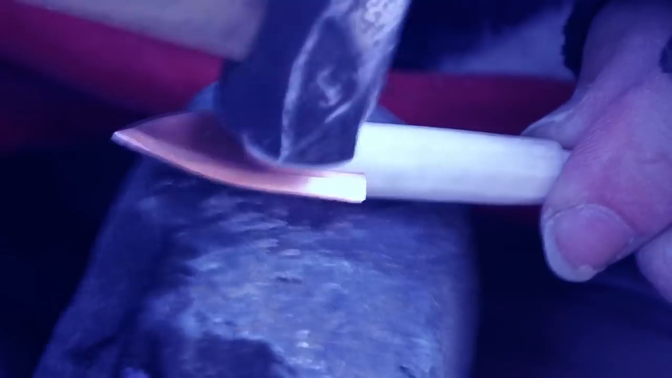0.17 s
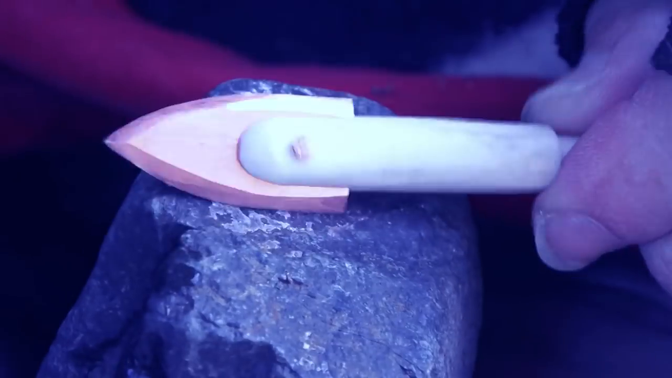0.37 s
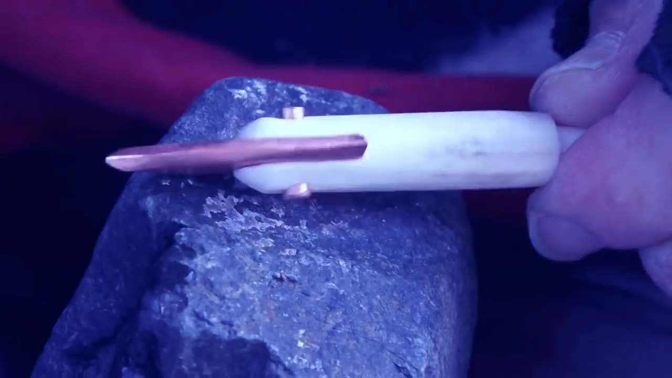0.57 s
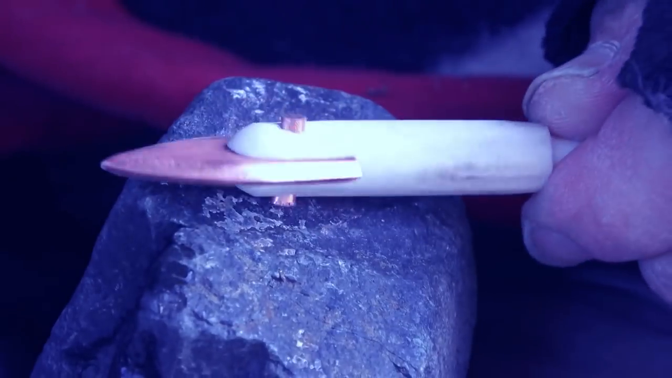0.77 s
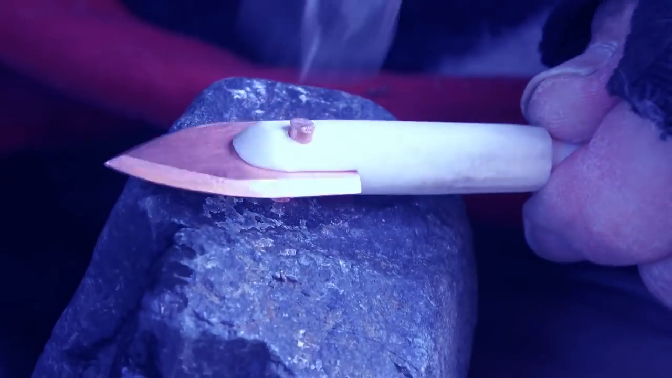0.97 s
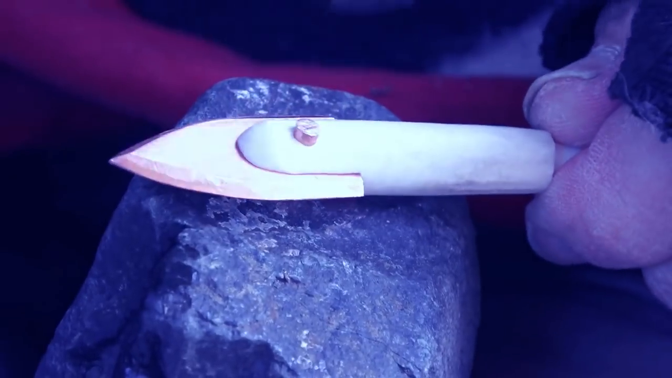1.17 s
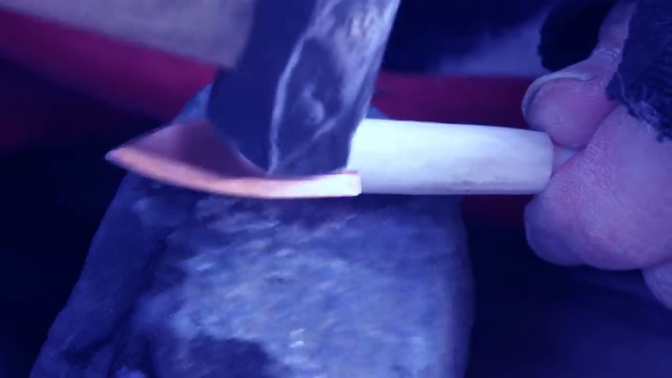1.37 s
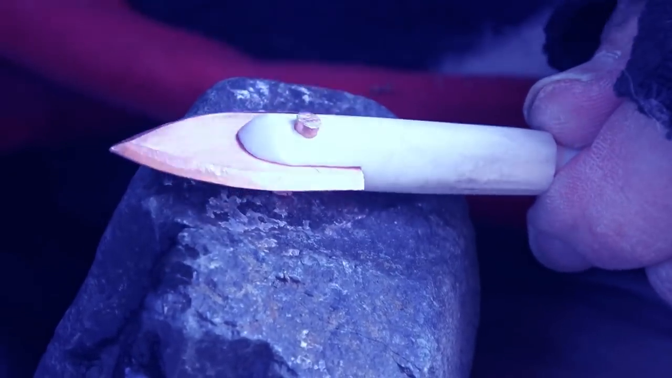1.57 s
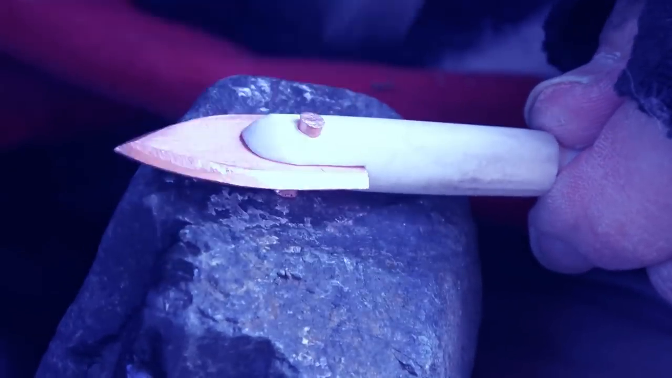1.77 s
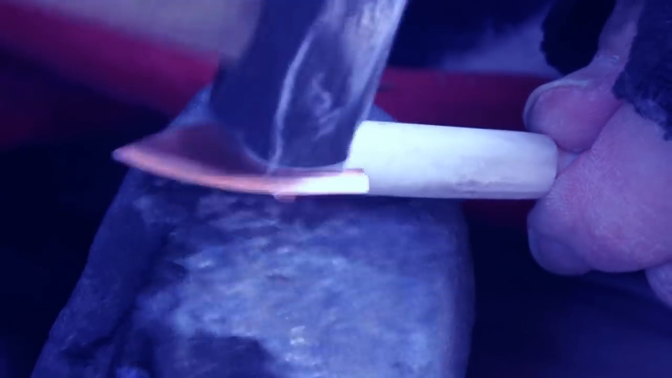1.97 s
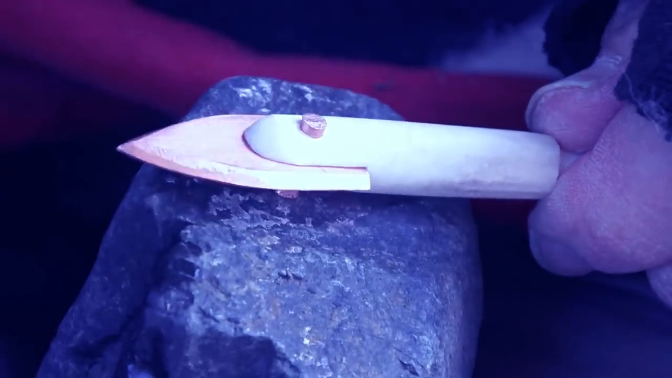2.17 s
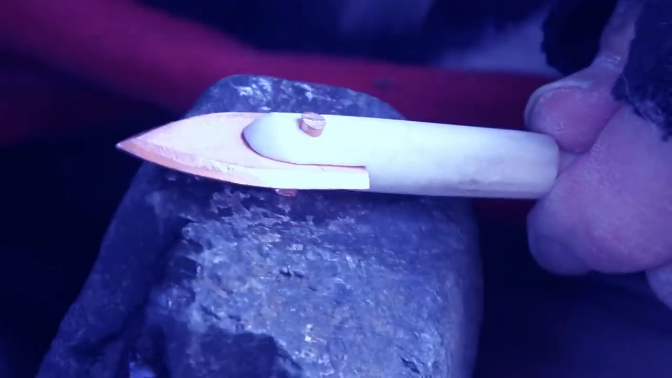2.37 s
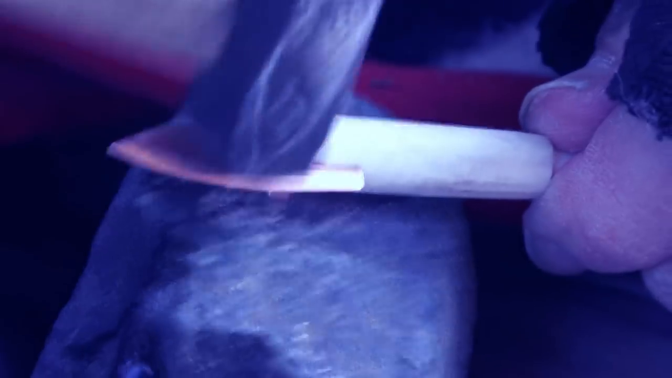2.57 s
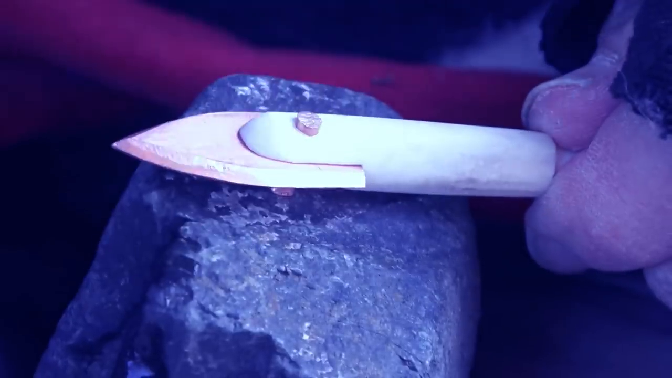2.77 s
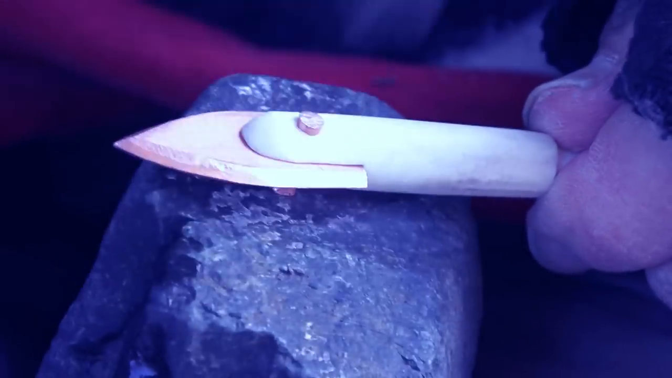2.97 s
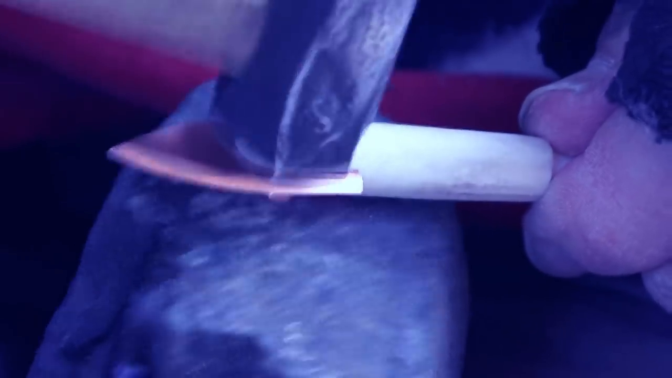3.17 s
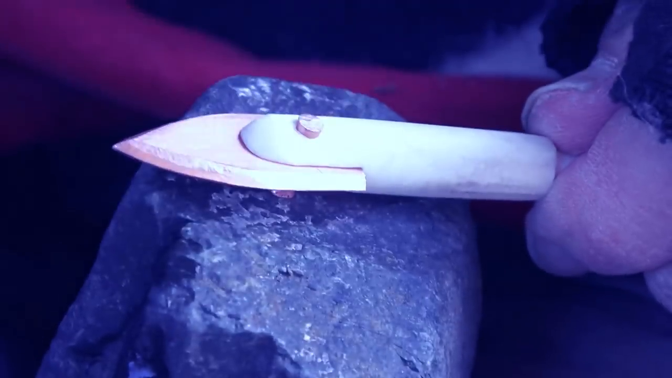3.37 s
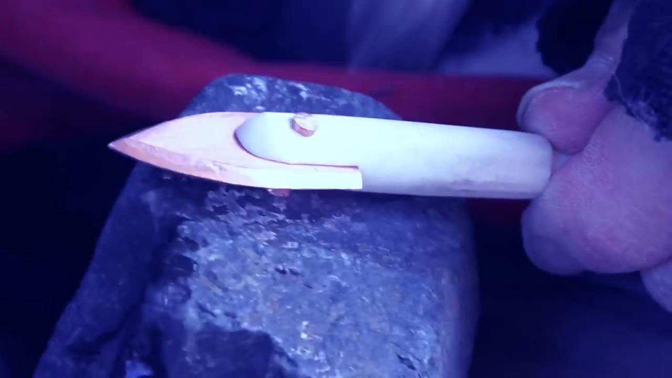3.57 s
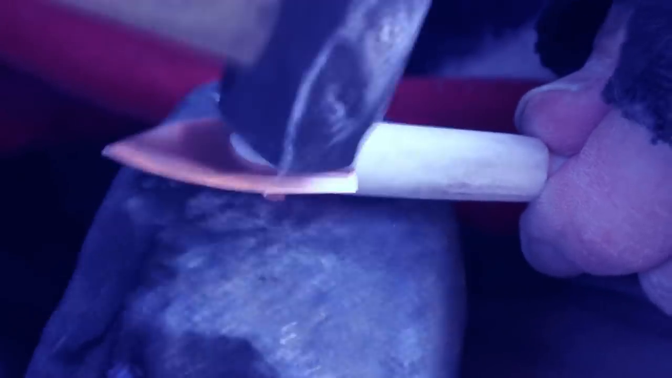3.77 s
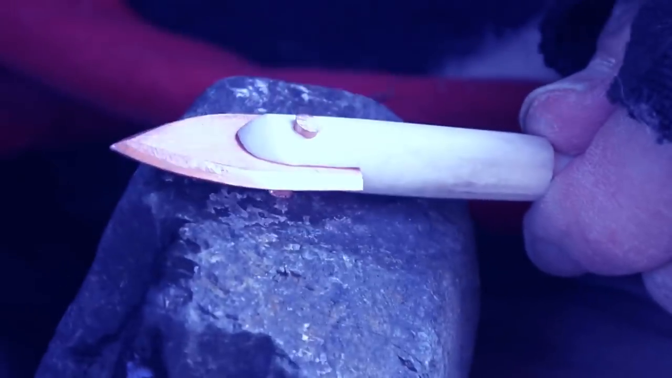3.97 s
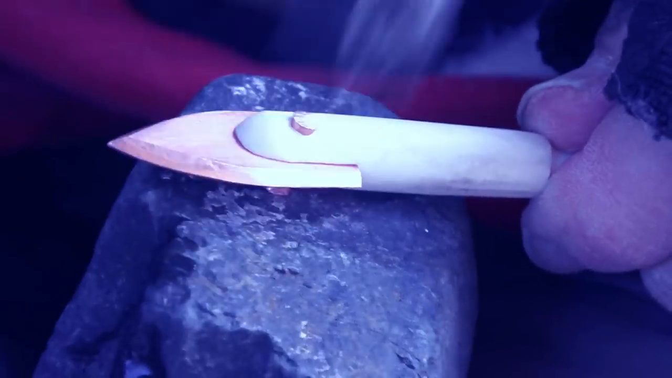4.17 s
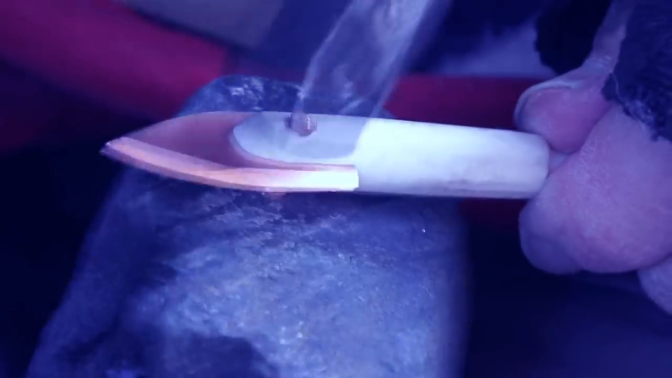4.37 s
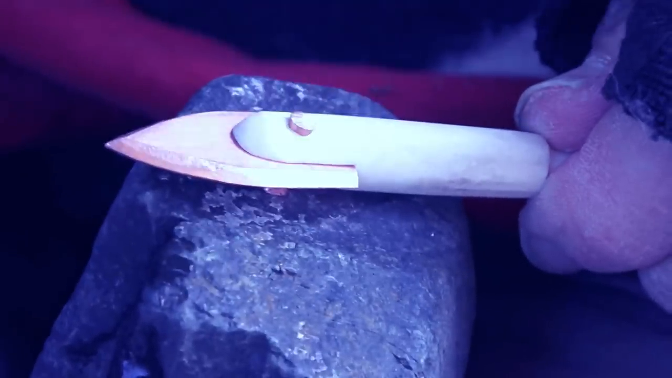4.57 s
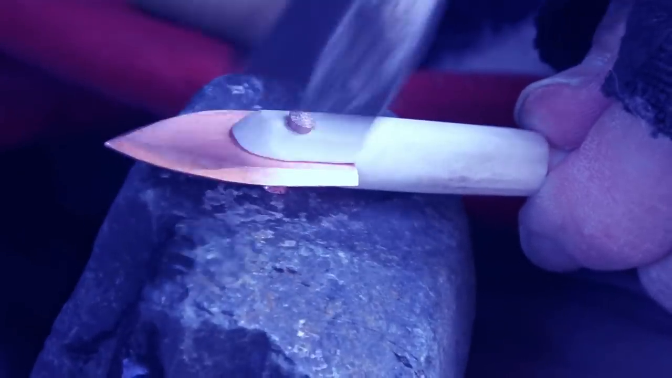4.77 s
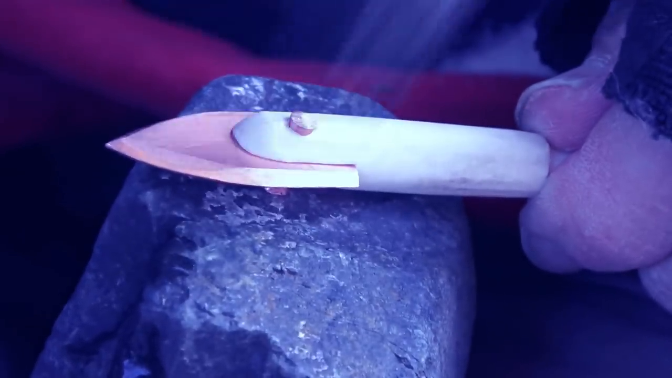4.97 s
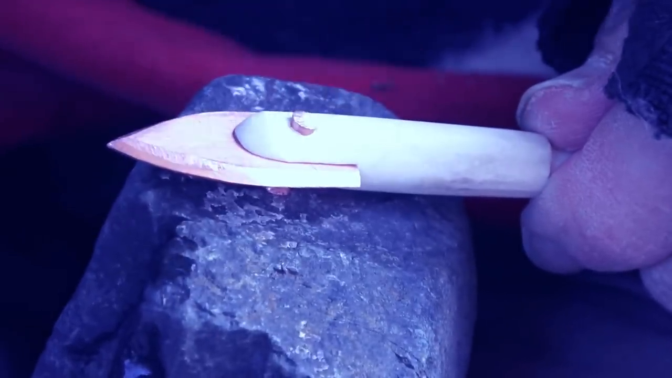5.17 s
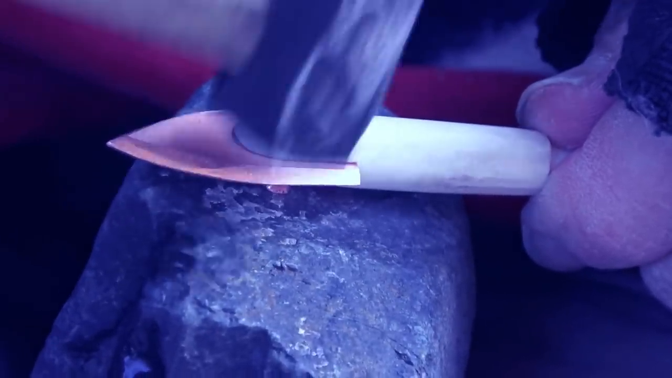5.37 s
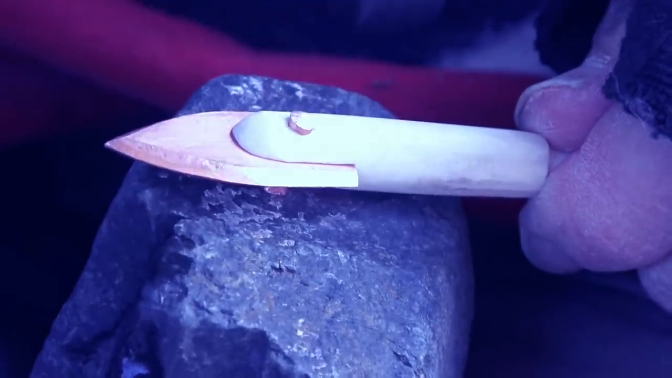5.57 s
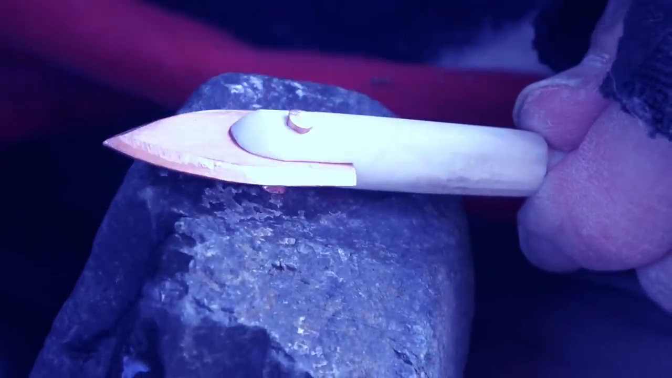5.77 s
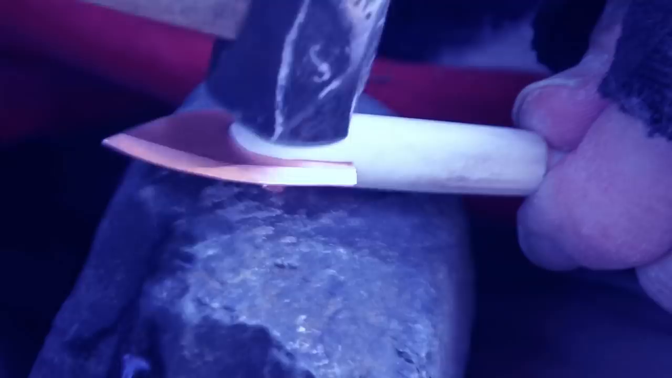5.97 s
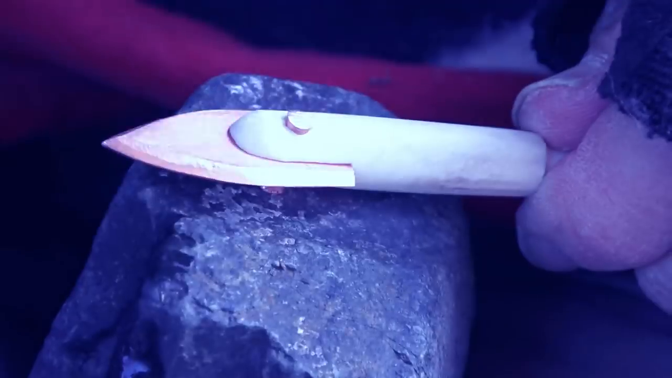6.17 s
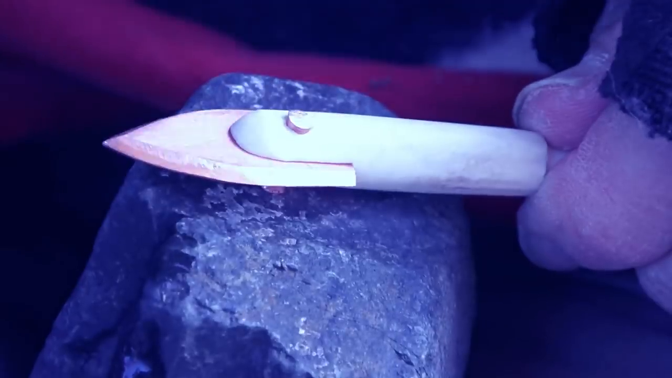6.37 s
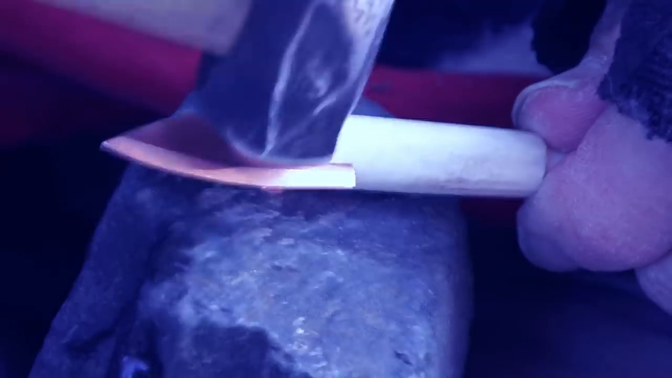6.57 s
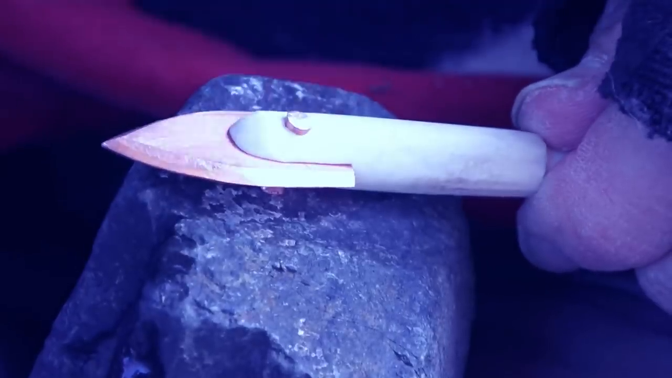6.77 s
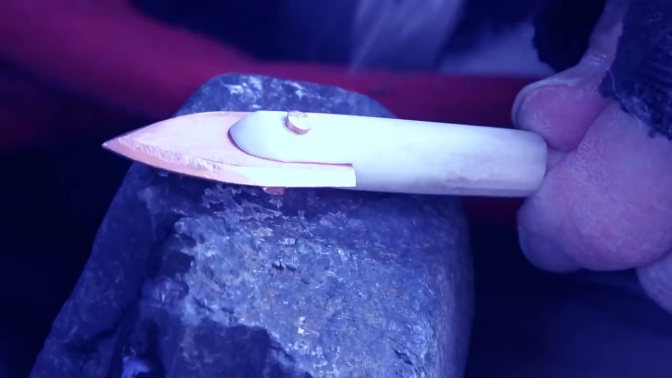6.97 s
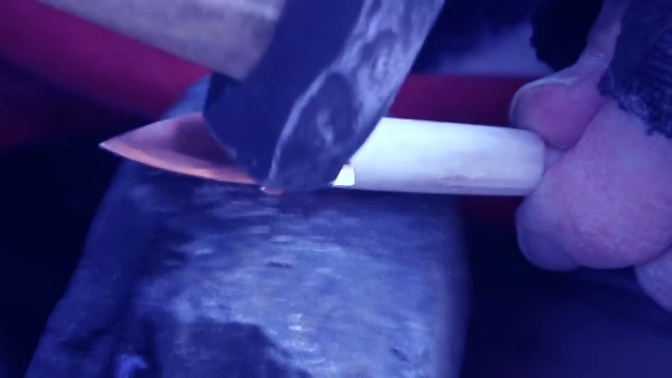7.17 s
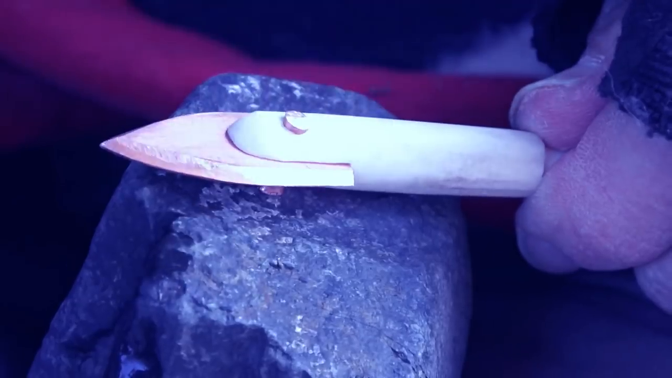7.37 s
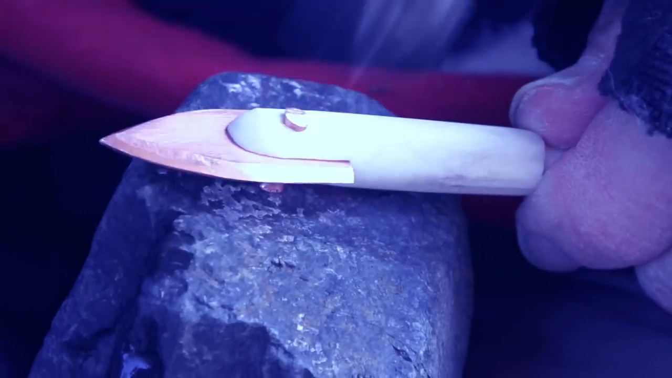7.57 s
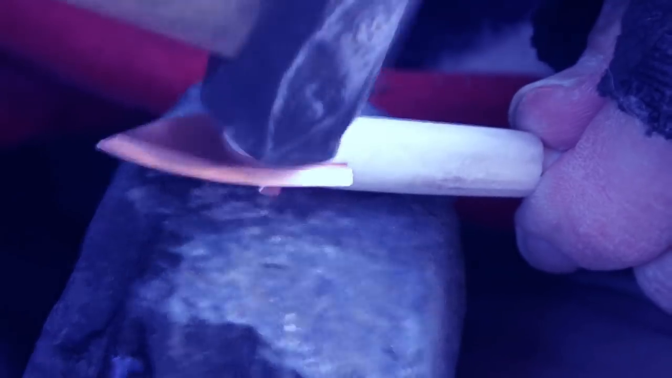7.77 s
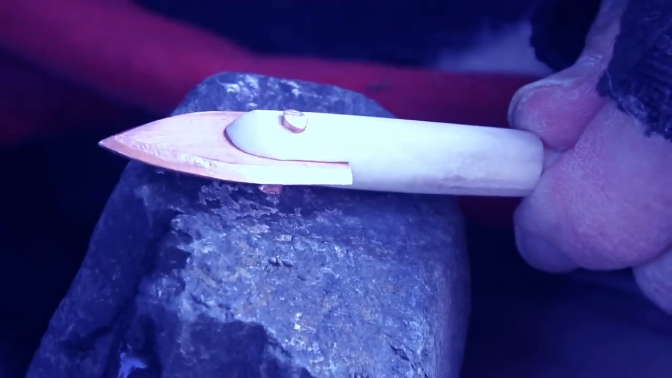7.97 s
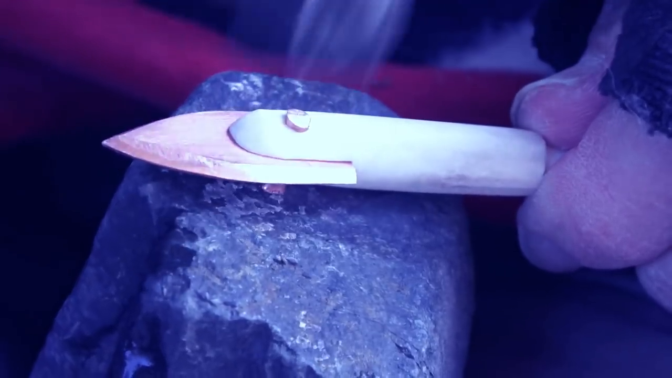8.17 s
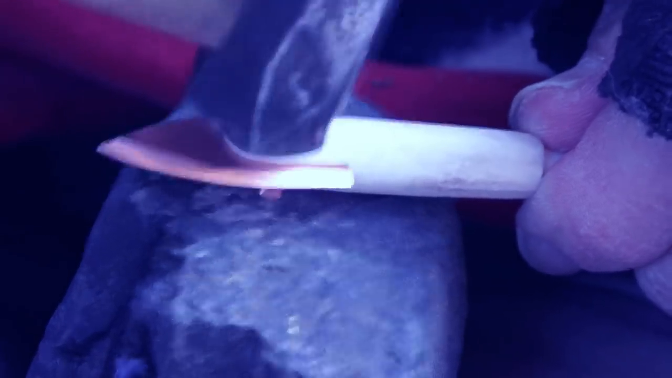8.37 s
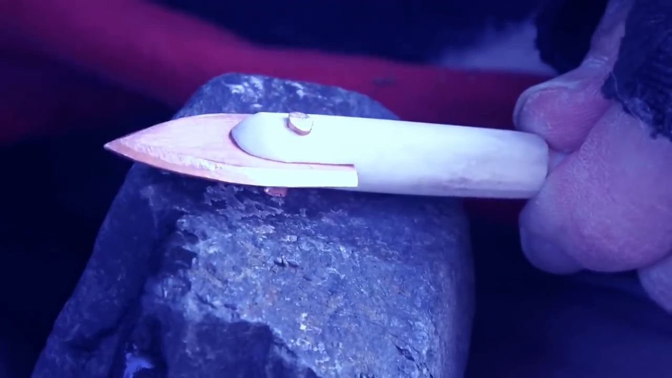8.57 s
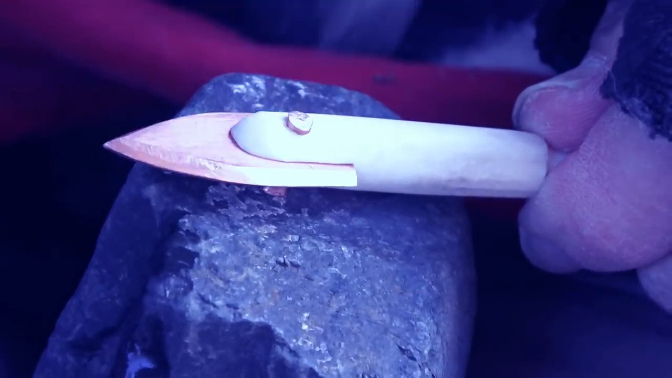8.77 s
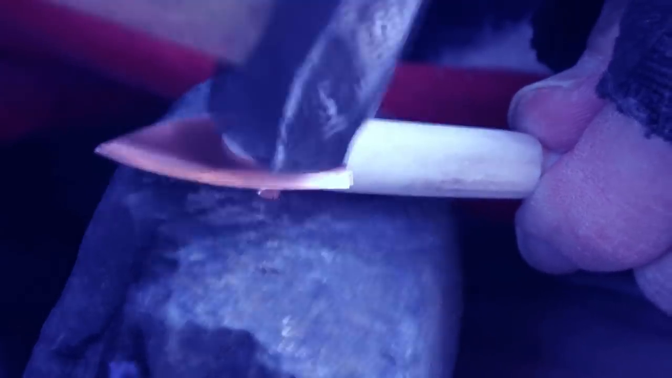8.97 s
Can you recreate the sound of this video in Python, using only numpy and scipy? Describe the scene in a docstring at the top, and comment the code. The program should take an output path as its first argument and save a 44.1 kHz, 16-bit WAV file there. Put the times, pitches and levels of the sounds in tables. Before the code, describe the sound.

A small hammer peens a copper rivet on a stone block, very close to one microphone. After a fading ring, one blow and a pause, the taps settle at about three a second, dry and hard with short steel rings, loud enough to distort. The work often bounces with a softer second click. A bird sings three quick high notes on three occasions over faint air and distant rumble.

```python
"""Copper rivet peened with a small hammer on a block of stone, one microphone close by, both channels alike.
It opens on a workshop still ringing from a blow; one blow, a pause, then about three a second to the end.
Each is a dry knock with a short steel ring, most loud enough to overload the input; after many the work
jumps and lands again. From 1.5 s a bird sings three notes, and again at 4.4 and 6.9 s: gliding sines, an echo.
Shaped noise makes the air and outdoor rumble throughout, with a swell near 2 s, then faint hums from afar."""
import sys
import numpy as np
from scipy import signal
from scipy.fft import rfft, irfft
from scipy.io import wavfile

SR = 44100
rng = np.random.default_rng(int(sys.argv[2]) if len(sys.argv) > 2 else 0)


def store_pcm(level_fs):
    """Save levels as 16-bit WAV."""
    pcm = np.round(np.clip(level_fs, -1, 1) * 32767).astype(np.int16)
    wavfile.write(sys.argv[1], SR, np.atleast_2d(pcm).T)


N = 401310

# hammer blows: [t/s, force level/dB, brightness/dB, high ping level/dB]
BLOWS = [(0.1779, 0, 2, -3), (1.0752, -7.5, -8.5, -6), (1.3961, -3.5, -0.5, -13), (1.6946, -3, 1, -2),
         (2.001, -1.5, 4, -4), (2.2984, 0, 2.5, -7), (2.5931, 0.5, 2, -10), (2.8916, -0.5, 3, 0.5),
         (3.1936, -1, 3.5, 8.5), (3.5008, -0.5, 3.5, 8.5), (3.8002, -1.5, 3.5, 9), (4.1058, -2.5, 3, 5.5),
         (4.4188, -1.5, 0, 1.5), (4.7344, -2.5, 4.5, 6), (5.0377, -2.5, 3, 4), (5.3547, -4, 0.5, -2),
         (5.6608, -3, 2, 2), (5.976, -4, 5, -10), (6.2836, -3, -0.5, 0), (6.582, -1, 3.5, 1),
         (6.8688, -1.5, 2.5, -2), (7.1717, -3, -3, -1.5), (7.4882, -3.5, -13, -2), (7.8050, -2, 0.5, -5),
         (8.1062, -0.5, 1.5, -4), (8.4068, -0.5, 2, -2), (8.7082, -1, 3.5, 5), (9.0074, -2, 3, 0)]
# the work lands again after a blow: [t/s, force level/dB]
REBOUNDS = [(1.7224, -19.5), (2.0317, -12), (2.918, -9), (3.2203, -8.5), (3.5355, -9.5), (3.8332, -10.5),
            (4.131, -11.5), (4.4564, -15.5), (5.076, -13), (5.3869, -16), (5.69, -12), (6.6199, -14.5),
            (6.9044, -10.5), (7.195, -12), (7.836, -12.5), (8.4408, -14), (9.0323, -12.5)]
# dead knock of rivet, haft and stone: [f/Hz, relative level/dB]
KNOCK = [(60, -12.5), (200, -14.5), (360, -1.5), (630, 5), (820, 0), (1000, -2), (1190, -5.5), (1450, 2),
         (1750, -1.5), (2100, -2), (3800, -15.5), (5000, -7.5), (9000, -22.5), (16000, -45.5)]
KNOCK_DB = 33  # added to the whole knock spectrum
# ringing modes of the steel head: [f/Hz, relative level/dB, t60/s]
HEAD = [(2872, -12.5, 0.013), (3006, -11, 0.017), (3107, -9.5, 0.025), (3345, -16, 0.021),
        (4605, -17.5, 0.009), (5810, -23, 0.015)]
# high ping of the head: [f/Hz, relative level/dB, t60/s]
PING = [(11632, -22.5, 0.072)]
PING_DB = 1  # added to every ping
# a square, bright blow rings the head, a dull one barely: level/dB at brightness 0, slope in dB per dB
RING_DB, RING_PER_BRIGHTNESS = -0.5, 1
# a harder landing pings more: level/dB at force 0, slope in dB per dB
REBOUND_PING_DB, REBOUND_PING_PER_FORCE = 18, 1.48
# as the rivet is beaten tight, a clack grows in the knock; it passes 0 dB at CLACK_USUAL_S
CLACK_HZ, CLACK_WIDTH_HZ, CLACK_DB_PER_S, CLACK_USUAL_S = 5040, 580, 0.9, 3
# the grip and the landing spot vary from blow to blow: standard deviations of the mode levels
HEAD_SCATTER_DB, KNOCK_SCATTER_DB = 1.6, 1.0
# the head rings sideways, towards hard surfaces nearby: [delay t/s, level/dB]
ECHOES = [(.0112, -6), (.0145, -13), (.0245, -15), (.028, -16), (.049, -21)]
# the nearest surface also returns the middle of the knock, most for square blows
SLAP_LOW_HZ, SLAP_HIGH_HZ, SLAP_DB = 1040, 1296, -13.5

# diffuse workshop sound: [f/Hz, level against the direct sound/dB, late t60/s]
ROOM = [(100, -12.5, 0.81), (450, -21.5, 0.22), (654, -25, 0.22), (1167, -10, 0.67), (1460, -21, 0.51),
        (2200, -18.5, 0.62), (2974, -12.5, 0.55), (3400, -6.5, 0.43), (4640, -24, 0.56), (8200, -16, 0.37),
        (11800, -13, 0.17), (15700, -2, 0.053)]
# resonances of the workshop: [f/Hz, level/dB, t60/s]
ROOM_MODES = [(579, -64, .12), (907, -66, .16), (1031, -66, .3), (1171, -65, .18), (1986, -68, .25),
              (3180, -66, .28), (3308, -67, .28)]
# the blow still ringing at the start: time before the start, force
EARLIER_S, EARLIER_DB = .125, 1.5

# voices of the bird's notes, before the pitch ratio and level of each singing:
# [length t/s, dip t/s, crest f/Hz, dip f/Hz, end f/Hz, level/dB, crescendo/dB, opening flick/share of pitch]
SLUR = [(.1, 0.038, 7690, 5610, 5980, -32.5, 0.5, .36), (.1, 0.05, 5630, 4465, 5090, -35, 13.5, 0.326)]
WHISTLE = [(.092, .014, 6950, 6960, 7060, -29.5, 5, 0)]
SWEEP = [(.141, .033, 4550, 3710, 4814, -30.5, 2.7, 0.31)]
NOTE_ATTACK_S, NOTE_RELEASE_S = 0.0093, .004
# three notes sung three times: [start t/s, note, pitch ratio, relative level/dB]
NOTES = [(1.49, SLUR, 1, 0), (1.685, WHISTLE, 1, 0), (1.847, SWEEP, 1, 0), (4.438, SLUR, 1.035, -7),
         (4.649, WHISTLE, 1.007, -5.5), (4.815, SWEEP, .99, -4), (6.885, SLUR, 1.01, -2),
         (7.137, WHISTLE, .99, 0), (7.314, SWEEP, 1.005, -.5)]
# echo around the bird: [f/Hz, level against the direct sound/dB, late t60/s]
YARD = [(2000, 10, 0.31), (4800, -4.5, 0.59), (6900, -2.5, 0.48), (12000, -6, 0.27)]

# spectrum of the air and hiss: [f/Hz, relative level/dB]
AIR = [(12, -58), (20, 8), (154, -12.5), (293, -11.5), (738, -21.5), (849, -25), (923, -22), (1090, -24),
       (2320, -32), (2820, -29.5), (3070, -33.5), (4670, -35.5), (6540, -38.5), (16000, -41)]
AIR_DB = -39.5
# spectrum of the distant rumble: [f/Hz, relative level/dB]
RUMBLE_COLOUR = [(30, -30), (70, 0), (130, 3.5), (210, 0.5), (280, -14.5), (400, -9), (600, -24.5),
                 (1500, -40.5)]
# the rumble holds a steady level and swells once, slowly up and faster down
RUMBLE_DB, SWELL_DB = -46, -37
SWELL_PEAK_S, SWELL_RISE_S, SWELL_FALL_S = 2.07, 1.58, 0.82
# faint hums from afar: [start t/s, end t/s, f/Hz, level/dB]
HUMS = [(2.59, 3.24, 220, -50), (2.82, 7.0, 388, -52.5), (4.7, 6.4, 549, -59), (2.1, 3.6, 160, -48),
        (4.97, 10, 175, -50)]

TOP_HZ = 15900  # upper limit of the microphone chain


def undb(db):
    """Decibels to gain."""
    return 10 ** (np.asarray(db) / 20)


def along(hz, table, axis=1):
    """Read a column of a table whose rows start with f/Hz, on a log-frequency axis."""
    table = np.array(table, float)
    return np.interp(np.log(hz + 1e-3), np.log(table[:, 0]), table[:, axis])


def add(track, start, sound):
    """Mix a sound into a track at a time in seconds."""
    i = max(int(round(start * SR)), 0)
    part = sound[:max(len(track) - i, 0)]
    track[i:i + len(part)] += part


def hammer(ring_lag_s=.0004, blow_hz=22000, rebound_hz=4800, rebound_bright_db=-1, rebound_ring_db=-9):
    """Blows and softer rebounds: each excites the work, the modes of the head and nearby echoes."""
    contacts = []
    for s, force_db, bright_db, ping_db in BLOWS:
        ring_db = RING_DB + RING_PER_BRIGHTNESS * bright_db
        contacts.append((s, force_db, bright_db, ring_db, ping_db, blow_hz))
    for s, force_db in REBOUNDS:
        ping_db = REBOUND_PING_DB + REBOUND_PING_PER_FORCE * force_db
        contacts.append((s, force_db, rebound_bright_db, rebound_ring_db, ping_db, rebound_hz))

    chance = rng.standard_normal((len(contacts), len(HEAD) + len(KNOCK)))
    out = np.zeros(N)
    ping = undb(PING_DB) * ring(PING)
    blur = np.clip(np.arange(len(ping)) / SR / 0.0025, 0, 1)  # uneven surfaces soften an echo's attack
    middle = signal.butter(2, [SLAP_LOW_HZ, SLAP_HIGH_HZ], "bandpass", fs=SR, output="sos")

    for (s, force_db, bright_db, ring_db, ping_db, contact_hz), luck in zip(contacts, chance):
        modes = [(hz, db + HEAD_SCATTER_DB * z, t60) for (hz, db, t60), z in zip(HEAD, luck)]
        head = undb(force_db + ring_db) * ring(modes)
        wobble_db = KNOCK_SCATTER_DB * luck[len(HEAD):]
        work = undb(force_db) * knock(s, bright_db, wobble_db, contact_hz)
        add(out, s, work)
        add(out, s + ring_lag_s, head + undb(force_db + ping_db) * ping)
        add(out, s + ECHOES[0][0], undb(SLAP_DB + ring_db) * signal.sosfilt(middle, work))
        for delay, db in ECHOES:
            add(out, s + delay, undb(db) * head * blur)
    return out


def knock(s, bright_db, wobble_db, contact_hz, corner_hz=1800, size=2048):
    """Minimum-phase pulse of the struck work; a harder contact lifts its treble, the grip shifts its colour."""
    hz = np.fft.rfftfreq(size, 1 / SR)
    colour = [(f, db + wobble) for (f, db), wobble in zip(KNOCK, wobble_db)]
    treble = hz ** 2 / (hz ** 2 + corner_hz ** 2)
    clack = np.exp(-((hz - CLACK_HZ) / CLACK_WIDTH_HZ) ** 2)
    db = KNOCK_DB + along(hz, colour) + bright_db * treble
    db += CLACK_DB_PER_S * (s - CLACK_USUAL_S) * clack
    db -= 20 * np.log10(1 + (hz / contact_hz) ** 2)  # a slower contact cannot drive the top
    # folding the cepstrum onto positive time makes the pulse causal
    cepstrum = irfft(np.log(undb(db)))
    cepstrum[1:size // 2] *= 2
    cepstrum[size // 2 + 1:] = 0
    return irfft(np.exp(rfft(cepstrum)))


def ring(modes, size=12000):
    """Struck modes: sines dying away exponentially, by 60 dB in each t60."""
    t = np.arange(size) / SR
    out = np.zeros(size)
    for hz, db, t60 in modes:
        out += undb(db) * np.sin(2 * np.pi * hz * t) * np.exp(-np.log(1000) * t / t60)
    return out


def workshop(x):
    """Direct sound, a diffuse tail and a few resonances that stand out of it."""
    response = tail(ROOM, gap_s=0.0096, early_db=7, early_t60=0.18)
    add(response, .008, ring(ROOM_MODES, size=24000))
    out = x + signal.fftconvolve(x, response)[:N]
    # only the room's answer to the earlier blow is left at the start
    earlier = ring(HEAD)
    add(earlier, 0, knock(0, 0, np.zeros(len(KNOCK)), SR / 2))
    add(out, 0, undb(EARLIER_DB) * signal.fftconvolve(earlier, response)[int(EARLIER_S * SR):])
    return out


def tail(bands, gap_s, early_db, early_t60, size=32768):
    """Diffuse response: noise bands fade in over the gap, then decay by an early and a late rate."""
    t, hz = np.arange(size) / SR, np.fft.rfftfreq(size, 1 / SR)
    white = rfft(rng.standard_normal(size))
    early = undb(early_db) * np.exp(-np.log(1000) * t / early_t60)
    out = 0
    for centre in np.geomspace(64, 16384, 17):  # half-octave steps
        share = np.clip(1 - 2 * abs(np.log2((hz + 1) / centre)), 0, 1)
        late = np.exp(-np.log(1000) * t / along(centre, bands, axis=2))
        decay = (late + early) * np.clip(t / gap_s, 0, 1) ** 2
        band = irfft(white * share * undb(along(hz, bands)))
        out = out + band * decay / np.linalg.norm(decay)
    return out


def bird(bird_db=-.5):
    """A two-voiced slur, a high whistle and a sweep that dips and rises, each trailing its echo."""
    out = np.zeros(N)
    for s, note, ratio, db in NOTES:
        for voice in note:
            add(out, s, undb(bird_db + db) * whistle(voice, ratio))
    echo = tail(YARD, gap_s=0.0041, early_db=-5, early_t60=0.22)
    return out + signal.fftconvolve(out, echo)[:N]


def whistle(voice, ratio, waver=0.0043, tremble_db=1.9):
    """A nearly pure tone starts at or below its crest, sinks to a dip and climbs as it grows louder."""
    length_s, dip_s, crest_hz, dip_hz, end_hz, db, crescendo_db, flick = voice
    t = np.arange(int(length_s * SR)) / SR
    attack = np.clip(t / NOTE_ATTACK_S, 0, 1)
    release = np.clip((length_s - t) / NOTE_RELEASE_S, 0, 1)
    sink = np.clip((dip_s - t) / (dip_s - NOTE_ATTACK_S), 0, 1) ** 2
    climb = np.sin(np.pi / 2 * np.clip((t - dip_s) / (length_s - dip_s), 0, 1))
    pitch = dip_hz + (crest_hz - dip_hz) * sink + (end_hz - dip_hz) * climb ** 1.4
    pitch = pitch * (1 - flick * (1 - attack))
    # slow random wander of pitch and level through 20 points
    points = np.linspace(0, length_s, 20)
    drift, tremble = (np.interp(t, points, z) for z in rng.standard_normal((2, 20)))
    level_db = db + crescendo_db * (t / length_s - .5) + tremble_db * tremble
    level = undb(level_db) * attack ** 2 * release
    phase = 2 * np.pi * np.cumsum(pitch * ratio * (1 + waver * drift)) / SR
    return np.sqrt(2) * level * np.sin(phase)


def background():
    """Steady air and hiss under a distant rumble that swells and fades; their powers add."""
    t = np.arange(N) / SR - SWELL_PEAK_S
    width_s = np.where(t < 0, SWELL_RISE_S, SWELL_FALL_S)
    swell = undb(SWELL_DB) * np.exp(-(t / width_s) ** 2)
    air = undb(AIR_DB) * noise(AIR)
    return air + np.hypot(undb(RUMBLE_DB), swell) * noise(RUMBLE_COLOUR)


def hums(width_hz=14, fade_s=0.19):
    """Narrow bands of noise, heard as wavering tones that come and go."""
    t, out = np.arange(N) / SR, 0
    for start, end, hz, db in HUMS:
        skirts = [(-3, -70), (-1, -12), (0, 0), (1, -12), (3, -70)]  # offset in widths, level/dB
        tone = noise([(hz + offset * width_hz, skirt_db) for offset, skirt_db in skirts])
        fade = np.clip(np.minimum(t - start, end - t) / fade_s, 0, 1)
        out = out + undb(db) * tone * fade
    return out


def noise(colour):
    """Gaussian noise of unit RMS level with a given spectrum."""
    gain = undb(along(np.fft.rfftfreq(N, 1 / SR), colour))
    x = irfft(rfft(rng.standard_normal(N)) * gain, N)
    return x / x.std()


def scene():
    """Everything reaches one microphone, the same in both channels."""
    mono = workshop(hammer()) + bird() + background() + hums()
    return np.tile(mono, (2, 1))


def record(dry, ceiling=0.91, order=8):
    """The input rounds off any peaks near its ceiling; a steep zero-phase low-pass cuts the top."""
    clipped = dry / (1 + abs(dry / ceiling) ** order) ** (1 / order)
    low_pass = signal.ellip(8, .05, 50, TOP_HZ, fs=SR, output="sos")
    return signal.sosfiltfilt(low_pass, clipped)


dry = scene()
out = record(dry)
store_pcm(out)
```